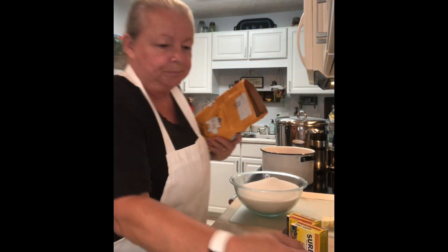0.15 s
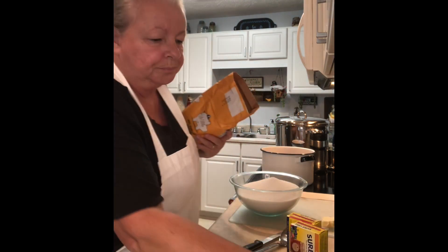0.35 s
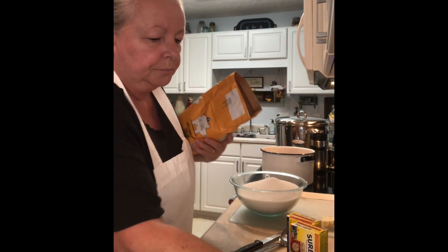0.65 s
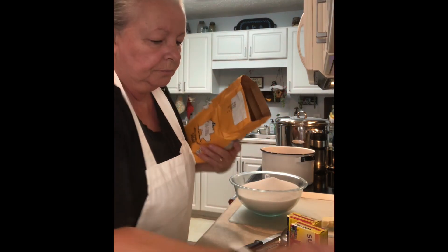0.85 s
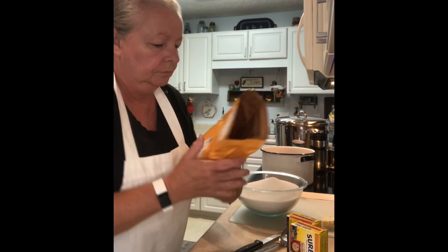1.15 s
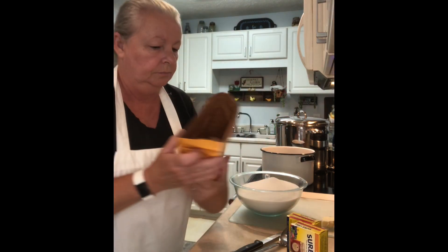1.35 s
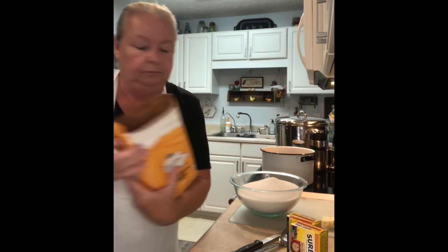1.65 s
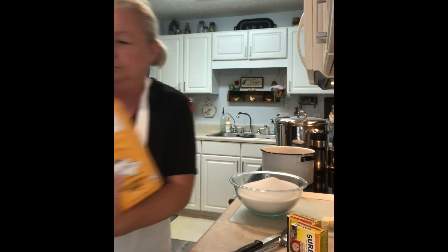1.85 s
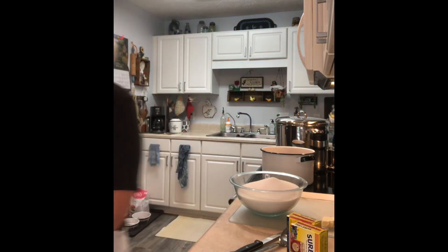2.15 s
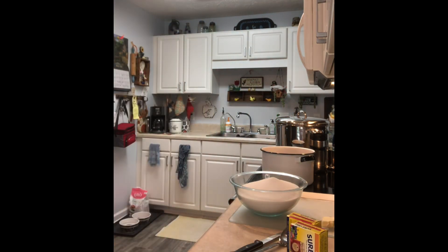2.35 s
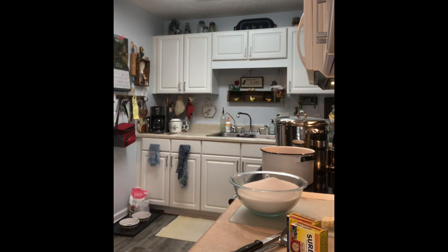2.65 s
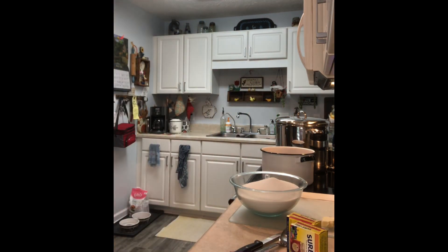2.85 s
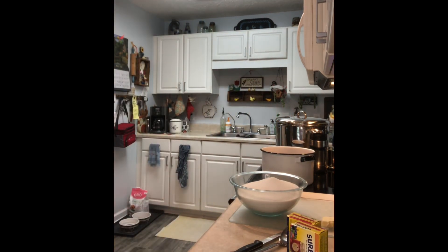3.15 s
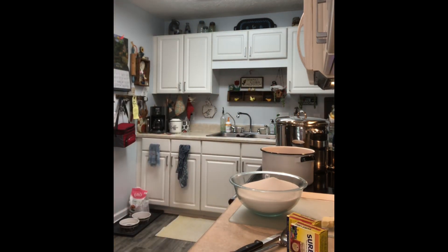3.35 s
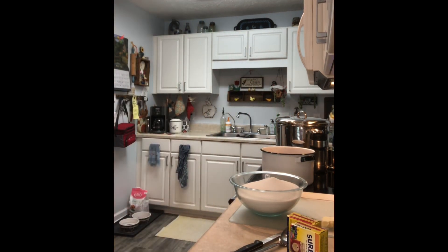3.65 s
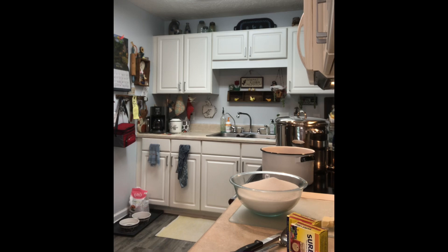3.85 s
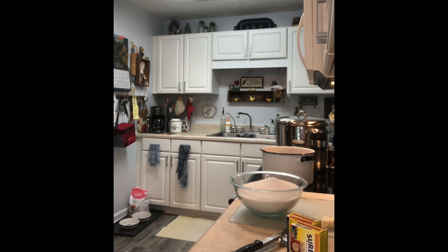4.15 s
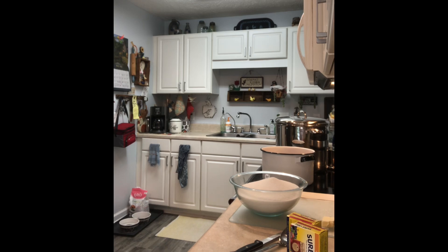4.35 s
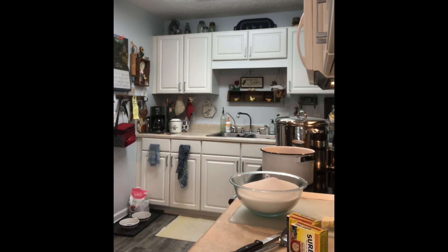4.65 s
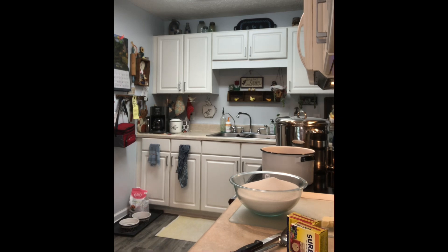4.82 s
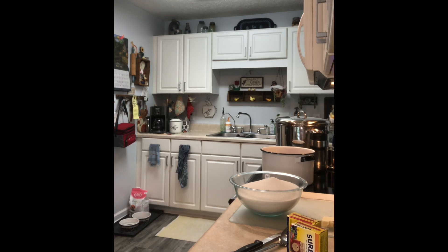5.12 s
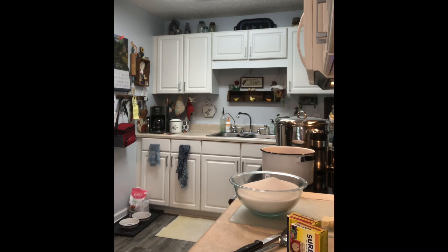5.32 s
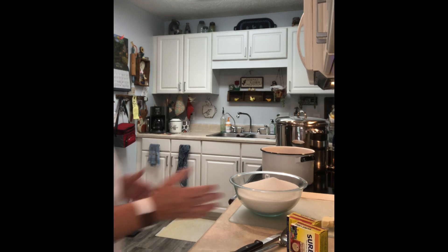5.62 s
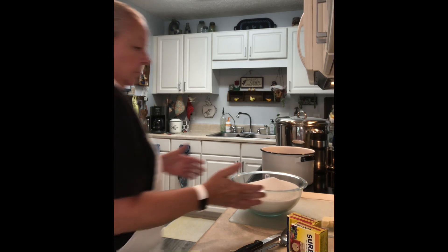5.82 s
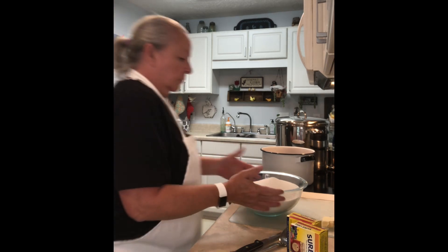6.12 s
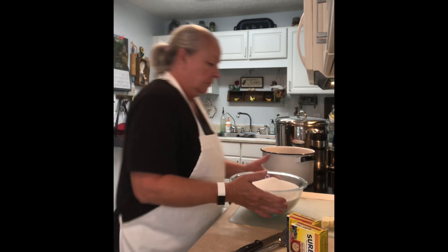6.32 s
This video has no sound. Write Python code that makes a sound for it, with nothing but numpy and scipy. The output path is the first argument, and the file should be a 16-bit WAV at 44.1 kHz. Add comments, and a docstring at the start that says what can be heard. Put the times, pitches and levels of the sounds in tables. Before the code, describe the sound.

In a home kitchen with low appliance hum, a metal utensil clinks down and a hard container lands with a sharp, bright knock. A paper sugar bag then rustles, with strong crackling snaps and hollow thumps around two seconds. Afterwards come faint off-screen knocks and short slides as things are put away, then soft steps and a faint hiss. One fixed microphone, close to the counter, with modest room reverberation.

```python
"""Kitchen counter with a paper bag

A steel utensil clinks down and a hard container is knocked onto the counter: both ring as sums of damped modes.
A paper sugar bag crackles as it is gripped, carried off and put away: random fibre slips pass through filters,
buckling creases make short pulses, and the bag thumps. Things are bumped and slid, as decaying or rubbed noise bands.
Soft steps boom on the floor, a faint streaky hiss comes near the end, and appliance noise fills the room."""
import sys
import numpy as np
from scipy import signal
from scipy.fft import rfft, irfft, next_fast_len
from scipy.io import wavfile
from scipy.ndimage import map_coordinates

SR = 44100
rng = np.random.default_rng(int(sys.argv[2]) if len(sys.argv) > 2 else 0)


def dump_mix(stems):
    """Bounce the given channels to the path in sys.argv[1] as a 16-bit WAV at rate SR."""
    frames = np.atleast_2d(stems).T  # one column per channel
    limited = np.clip(frames, -1, 1)  # hard clip at full scale
    pcm = np.round(limited * 32767).astype(np.int16)
    wavfile.write(sys.argv[1], SR, pcm)


N = 285768
RING_T = np.arange(SR // 2) / SR  # time within one blow [s]


def amp(db):
    """Level definition: decibels to amplitude gain."""
    return 10 ** (np.asarray(db) / 20)


def unit(x):
    """Normalisation: scale to rms 1."""
    return x / np.sqrt(np.mean(x ** 2) + 1e-20)


def along(points, hz):
    """Interpolation of (frequency, value) points on a logarithmic frequency axis."""
    f, v = np.transpose(points)
    return np.interp(np.log(hz + 1), np.log(f + 1), v)


def filtered(x, response):
    """Linear filtering: multiply the spectrum of x by a response of frequency."""
    m = next_fast_len(len(x) + SR // 4)
    freqs = np.fft.rfftfreq(m, 1 / SR)
    return irfft(rfft(x, m) * response(freqs), m)[:len(x)]


def coloured(x, spectrum):
    """Spectral shaping: filter x by a curve in dB, then scale to rms 1."""
    return unit(filtered(x, lambda hz: amp(along(spectrum, hz))))


def band(f, hz, q):
    """Resonance: response of a simple band-pass resonator applied twice."""
    damping = 1j * f * hz / q
    return (damping / (hz * hz - f * f + damping)) ** 2


def wobble(rate):
    """Slow random fluctuation: a smooth curve through `rate` random knots a second."""
    knots = rng.standard_normal(int(N * rate / SR) + 4)
    return map_coordinates(knots, [np.arange(N) * rate / SR])


def fade(t60):
    """Exponential decay: a free vibration falls by 60 dB in t60 seconds."""
    return np.exp(-np.log(1000) * RING_T / max(t60, 1e-3))


def burst(hz, q, t60):
    """Modal overlap: many close resonances around hz are heard as a decaying noise band."""
    noise = rng.standard_normal(len(RING_T))
    return unit(filtered(noise, lambda f: band(f, hz, q))) * fade(t60)


def ring(modes):
    """Modal superposition: damped sines of alternating sign, struck at slightly new strengths each time."""
    total = np.zeros(len(RING_T))
    for k, (hz, db, t60) in enumerate(modes):
        strength = (-1) ** k * amp(db + rng.standard_normal())
        total += strength * fade(t60) * np.sin(2 * np.pi * hz * RING_T)
    return total


def add(track, s, sound):
    """Superposition: mix a sound into the track at s seconds."""
    part = track[round(s * SR):][:len(sound)]
    part += sound[:len(part)]


STROKE_SHAPE = 1.73  # exponent: higher = flatter top and steeper ends


def stroke(s, rise, fall):
    """Sliding speed: it peaks at s seconds, with separate time scales for gathering and running out."""
    t = np.arange(N) / SR - s
    return np.exp(-np.abs(t / np.where(t < 0, rise, fall)) ** STROKE_SHAPE)


def grains(rate, spread_db):
    """Stick-slip friction: tiny slips are random impulses of unequal size."""
    happens = rng.random(N) < rate / SR
    size = rng.standard_normal(N) * amp(spread_db * rng.standard_normal(N))
    return unit(happens * size)


# reverberation of the kitchen: (frequency [Hz], t60 [s])
REVERB_TIMES = [(120, 0.77), (500, 0.41), (1500, 0.56), (3500, 0.45), (6000, 0.41), (10000, 0.65),
                (15000, 0.2)]


def in_room(x, wet_db, build=0.007, soft_hz=7500):
    """Reverberation: direct sound plus a noise tail that builds up quickly, decays by band and has lost its top."""
    hz, t, z = signal.stft(rng.standard_normal(len(RING_T)), SR, nperseg=256)
    absorbed = np.exp(-np.log(1000) * t / along(REVERB_TIMES, hz)[:, None])
    tail = signal.istft(z * absorbed, SR, nperseg=256)[1][:len(RING_T)]
    tail *= 1 - np.exp(-(RING_T / build) ** 2)
    tail = filtered(tail / np.linalg.norm(tail), lambda f: 1 / np.sqrt(1 + (f / soft_hz) ** 8))
    return x + amp(wet_db) * signal.fftconvolve(x, tail)[:len(x)]


# spectral shape of the room tone: (frequency [Hz], relative level [dB])
AIR_SPECTRUM = [(15, -44), (25, -18), (128, -9), (176, -8), (318, -9), (543, -12), (604, -15.5), (691, -16),
                (1060, -23.5), (1150, -22), (2430, -29), (3090, -29.5), (15000, -35.5)]
# appliance motor tones: (frequency [Hz], rms level [dB])
MOTOR_TONES = [(121, -75), (143, -72)]
DRONE_HZ, DRONE_Q = 345, 3
DRONE_DB, DRONE_SWING_DB = -70, 5  # middle level, greatest swing either way


def room_tone():
    """Stationary noise: shaped hiss, motor hum of unsteady phase, and a low drone that swells and sinks."""
    t = np.arange(N) / SR
    hum = np.zeros(N)
    for hz, db in MOTOR_TONES:
        phase = 2 * np.pi * hz * t + 0.4 * wobble(5.8)
        hum += amp(db) * np.sqrt(2) * np.sin(phase)
    drone = unit(filtered(rng.standard_normal(N), lambda f: band(f, DRONE_HZ, DRONE_Q)))
    drone *= amp(DRONE_DB + DRONE_SWING_DB * np.tanh(wobble(11)))
    air = amp(-60.5 + 0.19 * wobble(2.9)) * coloured(rng.standard_normal(N), AIR_SPECTRUM)
    return hum + drone + air


# swell of the faint hiss: (time of peak [s], rise [s], fall [s])
SHEEN_SWELL = (6.03, 0.16, 0.38)
# its narrow bands: (frequency [Hz], level [dB])
SHEEN_BANDS = [(2500, -77), (3550, -74), (4050, -75), (4480, -75), (5050, -76.5)]
SHEEN_Q, SHEEN_DRIFT = 16, 0.015  # band sharpness, pitch drift as a share of frequency


def sheen():
    """Frequency modulation: narrow noise bands, read at an uneven pace, drift in pitch as a faint streaky hiss."""
    out = np.zeros(N)
    for hz, db in SHEEN_BANDS:
        streak = unit(filtered(rng.standard_normal(N), lambda f: band(f, hz, SHEEN_Q)))
        clock = np.cumsum(1 + SHEEN_DRIFT * wobble(8))
        out += amp(db) * map_coordinates(streak, [clock], mode="mirror")
    return out * stroke(*SHEEN_SWELL)


# heels on the floor: (time [s], level [dB], frequency [Hz])
HEEL_STEPS = [(2.732, -47.5, 78.5), (5.545, -44.5, 81.5), (6.166, -52.5, 85)]


def steps():
    """Impact on a floor: a heel excites a low, damped boom with a soft onset."""
    out = np.zeros(N)
    for s, db, hz in HEEL_STEPS:
        boom = np.sin(2 * np.pi * hz * RING_T) * fade(0.25) + amp(-1.5) * burst(164, q=0.59, t60=0.13)
        add(out, s, amp(db) * boom * (1 - np.exp(-RING_T / 0.0027)))
    return out


# strokes of hand and cloth over the bag:
# (time of peak [s], length scale [s], scrape level [dB], fizz re scrape [dB], hollow body re scrape [dB])
RUB_STROKES = [(1.03, 0.17, -66.5, 7.5, -8), (1.175, 0.064, -62, -8, -4), (1.252, 0.042, -60, 9.5, -8),
               (1.361, 0.038, -61, 10, -21), (1.422, 0.062, -62.5, 2, -7), (1.55, 0.32, -64, 6, -31),
               (1.706, 0.24, -66, 17.5, -5), (1.933, 0.29, -61.5, 7, 4.5), (2.183, 0.46, -63.5, 0.5, 0.5),
               (2.459, 0.22, -65, 8.5, -8), (2.601, 0.14, -63.5, 15, -14), (2.732, 0.13, -60, -34, 1),
               (4.033, 0.17, -59.5, 3, -2), (4.153, 0.13, -69, 7, 3.5), (4.264, 0.18, -62.5, -1, 2.5)]
# spectral shapes of hollow body, scrape and crisp fizz: (frequency [Hz], relative level [dB])
BODY_SPECTRUM = [(150, -30), (300, -5.5), (550, 0.5), (900, -7.5), (1400, -13), (2500, -28)]
SCRAPE_SPECTRUM = [(700, -20), (1500, 2), (2500, 3.5), (3600, 2.5), (5500, -4.5), (7500, -26),
                   (9000, -59.5), (14000, -84.5)]
FIZZ_SPECTRUM = [(3000, -20.5), (7000, -6.5), (9000, -8.5), (12000, -6), (16000, -9.5)]
RISE_SHARE = 0.36  # part of the length scale given to speeding up
SLIPS_PER_S, SLIP_SPREAD_DB, GRIP_DB = 8000, 1.5, 1.2  # fibre slips, scatter in size, unevenness of grip


def rustle():
    """Friction noise: each rubbing stroke's dense fibre slips sound as scrape, crisp fizz and the bag's hollow."""
    slips = grains(rate=SLIPS_PER_S, spread_db=SLIP_SPREAD_DB)
    slips *= amp(GRIP_DB * wobble(50))  # the grip tightens and slackens
    body = coloured(slips, BODY_SPECTRUM)
    scrape = coloured(slips, SCRAPE_SPECTRUM)
    fizz = coloured(slips, FIZZ_SPECTRUM)
    out = np.zeros(N)
    for s, length, db, fizz_db, body_db in RUB_STROKES:
        speed = stroke(s, RISE_SHARE * length, (1 - RISE_SHARE) * length)
        out += amp(db) * speed * (scrape + amp(fizz_db) * fizz + amp(body_db) * body)
    return in_room(out, wet_db=-7.5)


CRUSH_S, CRUSH_LENGTH_S, CRUSH_DB = 1.88, 0.5, -54  # one squeeze of the bag
CRINKLES_PER_S = 110  # ticks per second of stroke length scale
CRINKLE_HZ = 3400  # middle pitch; each tick lies within an octave of it
CRINKLE_DB, CRINKLE_SPREAD_DB = 8, 3  # level above the stroke; half the greatest deviation


def crinkles():
    """Acoustic emission: rubbed or squeezed creases tick at random times and pitches, loudest in mid-stroke."""
    out = np.zeros(N)
    actions = [row[:3] for row in RUB_STROKES] + [(CRUSH_S, CRUSH_LENGTH_S, CRUSH_DB)]
    for s, length, db in actions:
        for when, size, pitch in rng.uniform(-1, 1, (round(CRINKLES_PER_S * length), 3)):
            tick = burst(CRINKLE_HZ * 2 ** pitch, q=1.2, t60=0.008)
            gain = amp(db + CRINKLE_DB + 2 * CRINKLE_SPREAD_DB * size) * (1 - when ** 2)
            add(out, s + when * length * 0.7, gain * tick)
    return in_room(out, wet_db=-9)


# creases of the bag snap: (time [s], level [dB], pitch [Hz], sharpness Q [-], buckling time [s])
CREASE_SNAPS = [(0.901, -54, 3650, 0.17, 0.0062), (1.6142, -34, 3100, 1.2, 0.0044),
                (1.619, -34.5, 1830, 0.54, 0.0048), (1.685, -44, 3460, 0.43, 0.0035),
                (1.692, -40, 2160, 0.71, 0.003), (1.708, -31, 3030, 0.91, 0.0047),
                (1.7348, -25.5, 4400, 0.72, 0.0026), (1.7955, -27, 4400, 0.64, 0.0012),
                (1.842, -38, 4370, 0.8, 0.0022), (1.858, -39, 5300, 0.53, 0.0025),
                (1.99, -27.5, 1780, 0.44, 0.0049), (2.007, -15, 6900, 1.05, 0.00098),
                (2.018, -33.5, 1530, 1.4, 0.0052), (2.076, -49, 1980, 1.1, 0.0092),
                (2.2067, -30.5, 2880, 1.36, 0.0026), (2.373, -36, 2640, 0.75, 0.0037),
                (3.377, -47, 6930, 0.39, 0.002), (5.642, -42.5, 4850, 0.62, 0.0015)]
SNAP_DB, SNAP_HZ = -35, 2860  # a middling snap, the reference of the hollow's level
HOLLOW_DB, HOLLOW_PER_DB, HOLLOW_DB_PER_OCTAVE = -12.5, -0.9, -8.5  # harder, higher snaps drum relatively less
CRACKLE_DB, CRACKLE_T60_S = -19, 0.11  # what lingers after a snap


def snaps():
    """Buckling: a crease gives way for milliseconds, crackles faintly on and drums on the hollow bag."""
    out = np.zeros(N)
    for s, db, hz, q, length in CREASE_SNAPS:
        hollow_db = HOLLOW_DB + HOLLOW_PER_DB * (db - SNAP_DB)
        hollow_db += HOLLOW_DB_PER_OCTAVE * np.log2(hz / SNAP_HZ)
        gate = np.exp(-(RING_T / length) ** 2)  # stops short
        pulses = gate * rng.choice([-1, 1], len(RING_T))
        buckle = filtered(pulses, lambda f: band(f, hz, q))
        buckle *= np.linalg.norm(gate) / np.linalg.norm(buckle)  # keep the energy of the gate
        crackle = amp(CRACKLE_DB) * burst(hz, q, CRACKLE_T60_S)
        hollow = amp(hollow_db) * burst(610, q=0.23, t60=0.12)
        add(out, s, amp(db) * (buckle + crackle + hollow))
    return in_room(out, wet_db=-11.5)


# brief slides of things handled: (time of peak [s], rise [s], fall [s], rasp level [dB], rasp pitch [Hz],
# body re rasp [dB], resonance [Hz], resonance re rasp [dB])
SLIDES = [(2.715, 0.024, 0.017, -55, 3870, -11, 5300, -18.5),
          (3.295, 0.044, 0.046, -54, 3340, -2.5, 4000, -16), (3.477, 0.0082, 0.029, -66, 4540, 9, 4960, 6),
          (3.56, .004, 0.032, -57.5, 2250, -5, 1520, -4.5), (3.676, 0.047, 0.11, -65, 2670, 4, 2680, -9),
          (3.767, 0.0046, 0.021, -61.5, 4540, 2.5, 6460, -8),
          (4.262, 0.0089, 0.028, -54.5, 2630, -4, 2080, 0), (4.371, .035, 0.073, -72, 1830, 6, 1230, -6),
          (4.797, 0.023, 0.036, -58, 2880, -23, 4240, -21),
          (5.539, 0.02, 0.049, -63.5, 2930, 5.5, 3700, -12),
          (5.65, 0.035, 0.055, -68.5, 2420, 1, 2380, -13),
          (6.074, 0.0056, 0.12, -61.5, 2520, -4, 3360, -14.5),
          (6.122, 0.04, 0.024, -59.5, 4000, 3.5, 5200, -18)]
SCUFF_Q, SCUFF_RING_Q = 0.84, 5.8  # sharpness of the rasping band and of the resonance


def scuffs():
    """Friction-driven resonance: a slide's slips excite a rasp, a low body and a resonance of the thing moved."""
    out = np.zeros(N)
    slips = grains(rate=9000, spread_db=-3)
    body = unit(filtered(slips, lambda f: band(f, 800, q=0.28)))
    for s, rise, fall, db, hz, body_db, ring_hz, ring_db in SLIDES:
        rasp = unit(filtered(slips, lambda f: band(f, hz, SCUFF_Q)))
        tone = unit(filtered(slips, lambda f: band(f, ring_hz, SCUFF_RING_Q)))
        mix = rasp + amp(body_db) * body + amp(ring_db) * tone
        out += amp(db) * stroke(s, rise, fall) * mix
    return in_room(out, wet_db=-3.5)


# first the low rebound of the knocked container, then things nudged and set down:
# (time [s], level [dB], pitch [Hz], click re dull knock [dB], t60 [s])
DULL_BUMPS = [(0.626, -31, 270, -32, 0.029), (2.596, -51, 630, -4, 0.19), (3.222, -53, 640, -15, 0.24),
              (3.473, -51.5, 356, -3, 0.16), (3.557, -50.5, 980, -12, 0.18),
              (3.766, -48.5, 334, -2.5, 0.11), (4.058, -46, 480, -28, 0.14),
              (4.149, -44.5, 540, -22, 0.053), (4.2502, -42.5, 1900, -3, 0.04),
              (4.2585, -42.5, 1750, -13, 0.057), (4.375, -47, 526, -22, 0.13),
              (4.389, -53.5, 706, -8.5, 0.14), (4.7053, -47.5, 739, -15, 0.2),
              (4.794, -47, 764, -5.5, 0.04), (6.07, -51, 790, -15, 0.17)]
THUD_DB, THUD_HZ, THUD_T60_S = -4.5, 221, 0.065  # the surface under each of them


def bumps():
    """Damped impact: a dull knock with a click of contact and a thud of the surface beneath."""
    out = np.zeros(N)
    for s, db, hz, click_db, t60 in DULL_BUMPS:
        click = amp(click_db) * burst(3060, q=0.71, t60=t60)
        thud = amp(THUD_DB) * burst(THUD_HZ, q=0.74, t60=THUD_T60_S)
        dull = burst(hz, q=0.99, t60=t60)
        add(out, s, amp(db) * (dull + click + thud))
    return in_room(out, wet_db=-7.0)


# the heavy bag thumps: (time [s], level [dB], pitch [Hz], t60 [s], low thud re note [dB])
BAG_THUMPS = [(1.622, -39, 698, 0.06, -9), (1.867, -44, 657, 0.051, -6), (1.881, -36, 624, 0.045, -12),
              (1.94, -38, 374, 0.069, -9), (1.996, -36.5, 480.5, 0.21, -11),
              (2.008, -29, 1476, 0.027, -12.5), (2.02, -38.5, 676, 0.057, -5.5),
              (2.1026, -25, 497, 0.019, -10.5), (2.376, -44, 552, 0.091, -14)]
THUMP_LOW_HZ = 111  # the bag is too small to radiate well below this


def thumps():
    """Radiation from a small body: the bumped bag gives a hollow note and a soft thud, weakened in the bass."""
    out = np.zeros(N)
    for s, db, hz, t60, thud_db in BAG_THUMPS:
        note = np.sin(2 * np.pi * hz * RING_T) * fade(t60) * (1 - np.exp(-RING_T / 0.00037))
        thud = np.sin(2 * np.pi * 221 * RING_T) * fade(0.1) + amp(2.0) * burst(327, q=0.68, t60=0.083)
        contact = amp(-14) * burst(2500, q=0.58, t60=0.016)
        add(out, s, amp(db) * (note + amp(thud_db) * thud + contact))
    radiated = filtered(out, lambda f: (1j * f / (THUMP_LOW_HZ + 1j * f)) ** 3)
    return in_room(radiated, wet_db=-10.0)


# the utensil lands, then chatters with its ring mostly held: (time [s], ring gain [dB], tick gain [dB])
CLINK_CONTACTS = [(0.4524, 0, 6), (0.4768, -18, -7), (0.4857, -16, -7)]
# modes of the steel: (frequency [Hz], level before the ring gain [dB], t60 [s])
STEEL_MODES = [(1351, -48.5, .42), (1500, -48, .2), (1750, -46, .08), (1915, -40, .1), (1955, -41, .21),
               (2304, -52, .22), (2880, -44, .08), (3079, -51, .35), (3295, -54, .24), (3564, -55, .4),
               (3924, -55, .35), (4130, -45, .06), (4457, -50, .46), (5076, -59, .4), (5290, -40, .09),
               (5927, -46, .11), (6234, -41, .1), (6320, -51, .25), (6519, -49, .15), (7267, -50, .13),
               (8000, -44, .09), (8511, -44, .11), (10350, -42, .11)]


def utensil():
    """Modal ringing: each contact rings the steel, which buzzes on the board, jangles, ticks and thumps the board."""
    out = np.zeros(N)
    for s, ring_db, tick_db in CLINK_CONTACTS:
        buzz = amp(-40) * burst(1950, q=7, t60=0.17)
        # many weak modes
        jangle = amp(-43) * burst(2600, q=0.8, t60=0.2) + amp(-46) * burst(8500, q=0.9, t60=0.15)
        tick = amp(-34) * burst(5600, q=0.35, t60=0.02)
        board = amp(-44.5) * burst(327, q=1.02, t60=0.15)
        ringing = ring(STEEL_MODES) + buzz + jangle
        add(out, s, amp(ring_db) * ringing + amp(tick_db) * (tick + board))
    return in_room(out, wet_db=-11)


KNOCK_S, KNOCK_DB = 0.6028, 1.5  # the container lands on the counter: time, gain of the whole blow
# strong modes of container and counter: (frequency [Hz], level before the blow's gain [dB], t60 [s])
COUNTER_MODES = [(166, -35.5, 0.13), (249.7, -27.5, 0.021), (343, -38.5, 0.031), (484.4, -32, 0.029),
                 (705, -20.5, 0.067), (790, -24, 0.068), (971, -24, 0.11), (1075, -26.5, 0.039),
                 (1329, -19, 0.033), (1494, -17.5, 0.028), (1744, -20.5, 0.03), (1910, -29.5, 0.05),
                 (2105, -20.5, 0.03), (3234, -19.5, 0.024), (3480, -18, 0.028), (3764, -28, 0.024),
                 (4170, -33, .025), (5320, -20, 0.015), (5500, -13, 0.015), (6250, -42, 0.03),
                 (7680, -37.5, 0.055), (8600, -33.5, 0.03), (10280, -19.5, 0.018)]
# clusters of close modes that ring on in the container's wall:
# (frequency [Hz], level before the blow's gain [dB], sharpness Q [-], t60 [s])
WALL_CLUSTERS = [(3370, -38, 9, 0.22), (5570, -46.5, 26, 0.29), (5960, -43.5, 5, 0.16)]


def knock():
    """Impact excitation: the container's base rings strong modes over a dense clatter, which fills the room."""
    modes, rattle = np.zeros(N), np.zeros(N)
    blow = amp(KNOCK_DB) * (1 - np.exp(-RING_T / 0.00022))
    crack = amp(-23.5) * burst(2600, q=0.33, t60=0.017)
    clatter = amp(-27.5) * burst(620, q=0.81, t60=0.088)
    clatter += amp(-36.5) * burst(1270, q=1.8, t60=0.27)
    clatter += amp(-39.5) * burst(7100, q=0.75, t60=0.16)
    wall = sum(amp(db) * burst(hz, q, t60) for hz, db, q, t60 in WALL_CLUSTERS)
    add(modes, KNOCK_S, blow * ring(COUNTER_MODES))
    add(rattle, KNOCK_S, blow * (crack + clatter + wall))
    return in_room(modes, wet_db=-17) + in_room(rattle, wet_db=-11)


def scene():
    """Superposition: all sources add at one microphone."""
    impacts = knock() + utensil() + snaps() + thumps() + bumps() + steps()
    friction = rustle() + crinkles() + scuffs()
    background = sheen() + room_tone()
    return (impacts + friction + background)[None]


# response of the microphone: (frequency [Hz], gain [dB])
MICROPHONE_RESPONSE = [(1000, 1.5), (7500, -2.5), (8500, -6), (12000, -9), (16000, -12)]
TOP_HZ = 15900  # band limit


def record(dry):
    """Frequency response: the microphone softens the top, and nothing is kept from the band limit up."""
    def response(hz):
        return amp(along(MICROPHONE_RESPONSE, hz)) * (hz < TOP_HZ)
    return np.array([filtered(channel, response) for channel in dry])


dry = scene()
out = record(dry)
dump_mix(out)
```